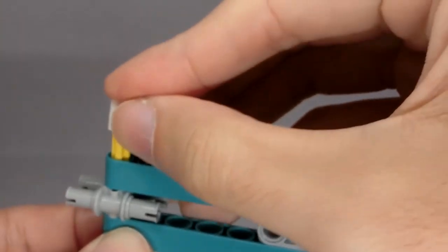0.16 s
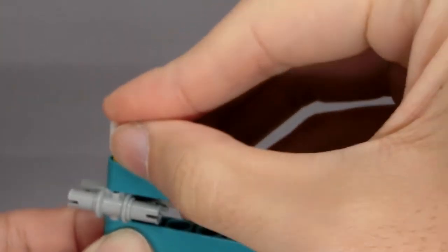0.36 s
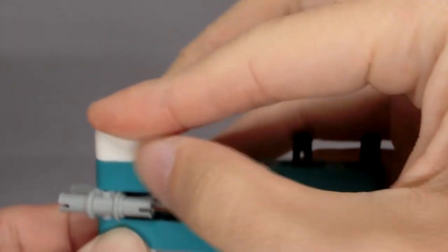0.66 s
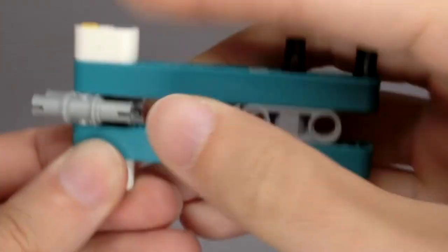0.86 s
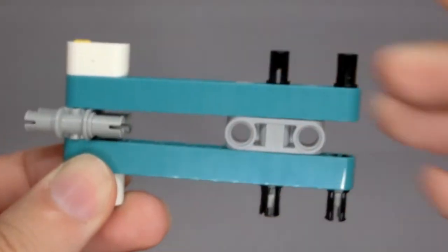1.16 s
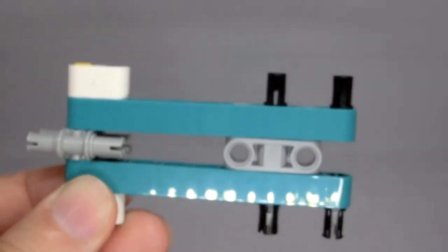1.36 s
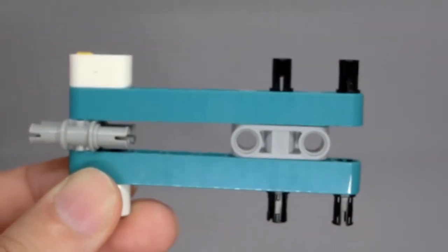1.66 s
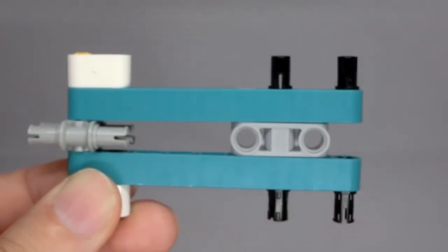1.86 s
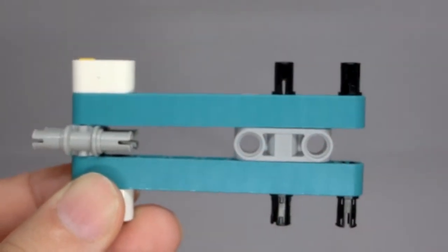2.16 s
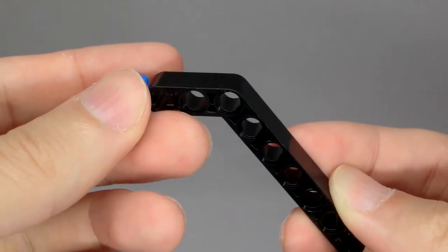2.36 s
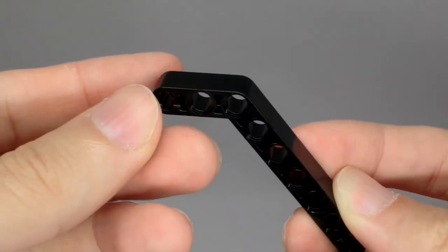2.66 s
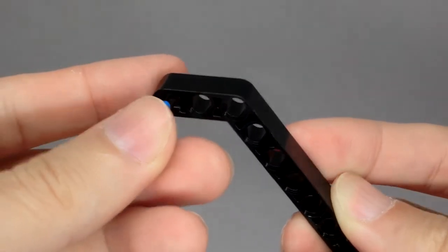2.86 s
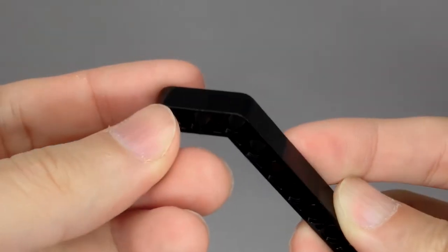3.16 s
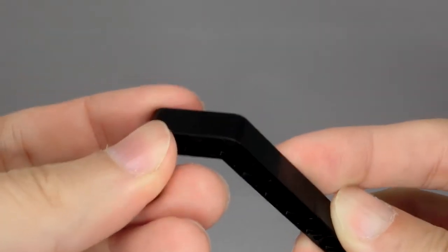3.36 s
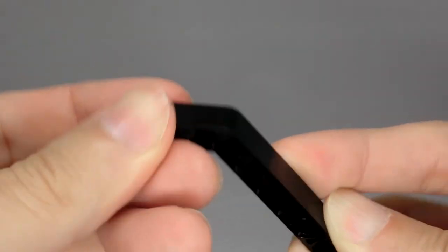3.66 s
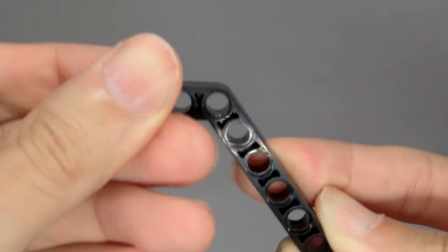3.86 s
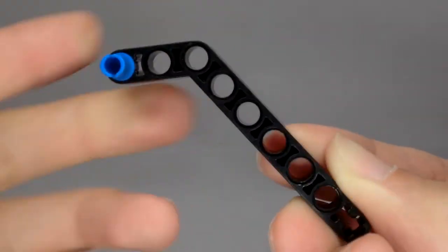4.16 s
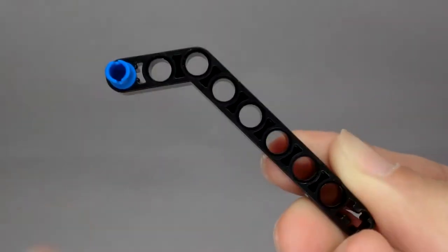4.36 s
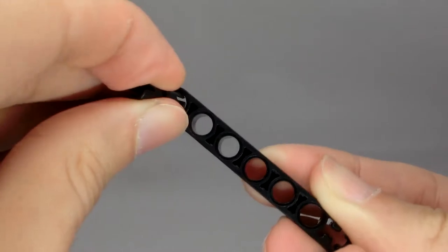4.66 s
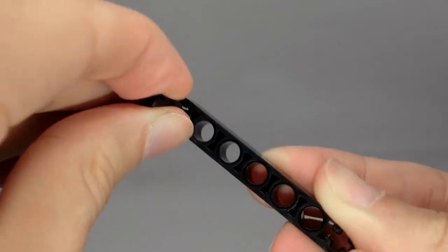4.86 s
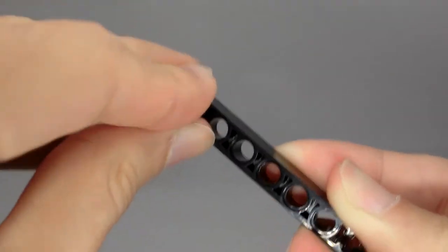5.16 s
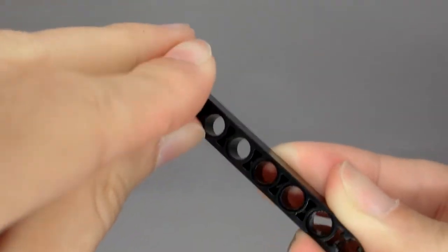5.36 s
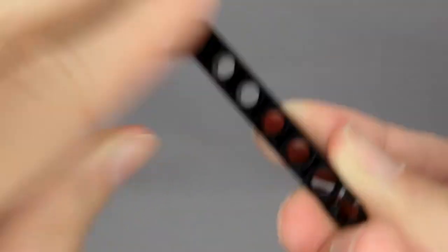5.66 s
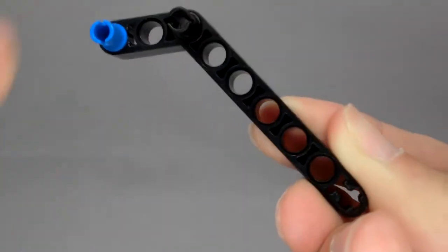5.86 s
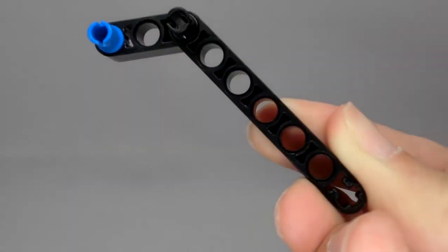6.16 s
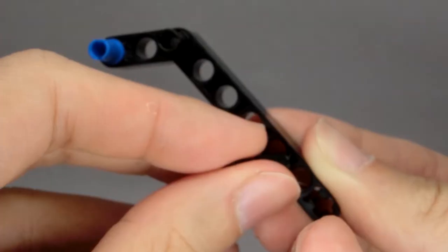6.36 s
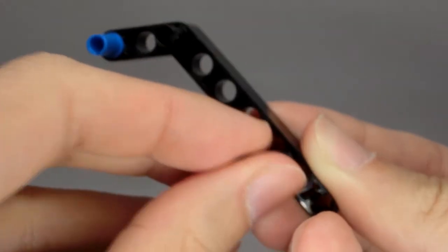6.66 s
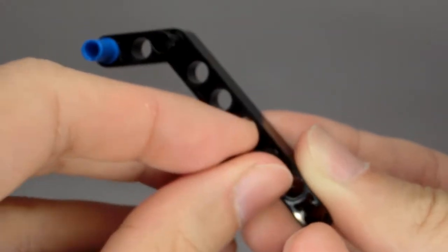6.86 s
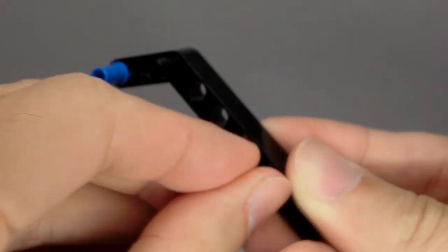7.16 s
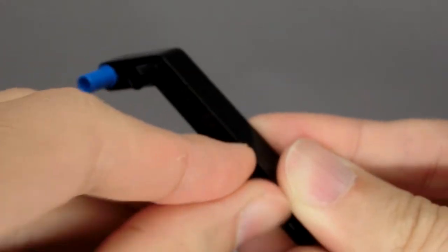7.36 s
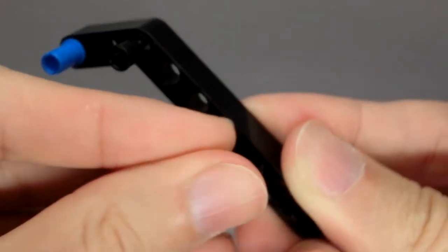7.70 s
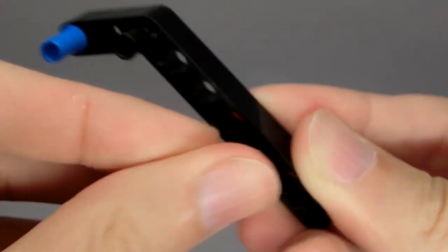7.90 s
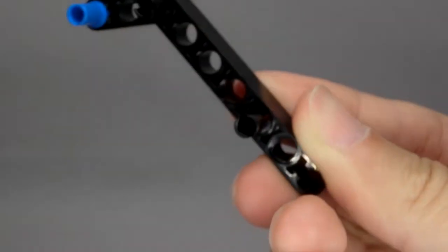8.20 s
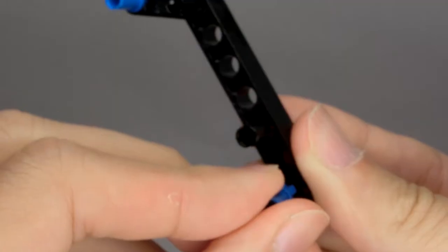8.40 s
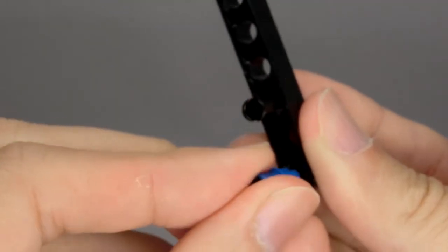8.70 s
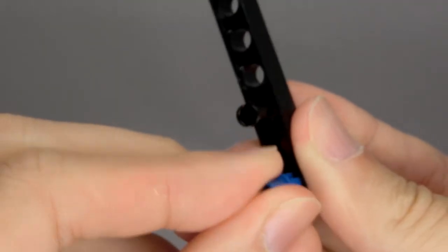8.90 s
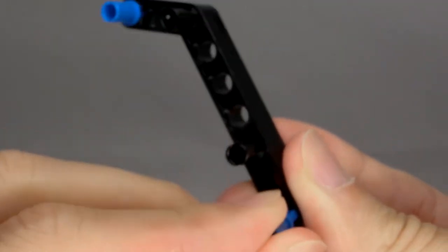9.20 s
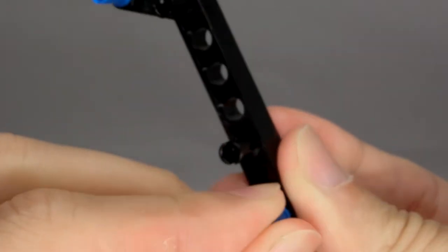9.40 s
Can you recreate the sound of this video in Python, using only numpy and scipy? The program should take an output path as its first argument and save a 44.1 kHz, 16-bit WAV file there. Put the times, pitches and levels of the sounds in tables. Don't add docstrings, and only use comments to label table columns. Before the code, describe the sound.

Close by, plastic pins snap sharply into plastic beams, two early and one midway, among light clacks, ticks and skin rubs in a quiet room.

```python
import sys
import numpy as np
from scipy import signal
from scipy.fft import rfft, irfft, next_fast_len
from scipy.io import wavfile
from scipy.ndimage import uniform_filter1d

SR = 44100
rng = np.random.default_rng(int(sys.argv[2]) if len(sys.argv) > 2 else 0)


def store_pcm(level_fs):
    pcm = np.round(np.clip(level_fs, -1, 1) * 32767).astype(np.int16)
    wavfile.write(sys.argv[1], SR, np.atleast_2d(pcm).T)


def natural_amplitude(level_db):
    exponent = np.asarray(level_db, float) / 20
    return 10 ** exponent


N = 420713
LEAD = 24


def evened(x):
    return x / np.sqrt(np.mean(x ** 2) + 1e-20)


def read(points, hz):
    f, value = np.transpose(points)
    return np.interp(np.log(hz + 1), np.log(f + 1), value)


def add(mix, s, sound):
    part = mix[:, round(s * SR):][:, :sound.shape[1]]
    part += sound[:, :part.shape[1]]


def panned(x, db):
    return x * natural_amplitude(np.array([[db / 2], [-db / 2]]))


def drift(top_hz):
    t = np.arange(0, N / SR + 1, .01)
    slow = 0
    for f in np.geomspace(.2, top_hz, num=24):
        slow = slow + np.sin(2 * np.pi * (f * t + rng.random())) / np.sqrt(f)
    return np.interp(np.arange(N) / SR, t, evened(slow))


def ring(drive, modes):
    t = np.arange(len(drive)) / SR
    body = 0
    for hz, width, db in modes:
        swell_and_fade = width * width * t * np.exp(-np.pi * width * t)
        body = body + natural_amplitude(db) * swell_and_fade * np.sin(2 * np.pi * hz * t)
    out = signal.fftconvolve(drive, body)[:len(drive)]
    return out / abs(out).max()


def crack(rattle_db, rattle_s):
    t = np.arange(2000) / SR
    grit = rng.standard_normal(2000)
    blow = 1. * (t == 0)
    return blow, natural_amplitude(rattle_db) * grit * np.exp(-t / rattle_s)


def coloured(drive, db, build_up=0):
    log_gain = np.log(natural_amplitude(np.maximum(np.r_[db, db[-2:0:-1]], -90)))
    phase = (1 - build_up) * signal.hilbert(log_gain).imag
    taps = np.roll(np.fft.ifft(np.exp(log_gain - 1j * phase)).real, LEAD)[:1024]
    swell = np.minimum(np.arange(len(taps)) / LEAD, 1)
    return signal.fftconvolve(drive, taps * swell)[:len(drive)]


def room(x):
    # (f/Hz, time to fall 60 dB/s)
    decay = [(300, 0.089), (1000, 0.065), (3500, 0.17), (8000, 0.094), (15000, 0.085)]
    taps = np.zeros((2, SR // 2))
    starts = np.arange(100, SR // 2 - 12, 12)
    at = starts + rng.integers(0, 12, (2, len(starts)))
    np.put_along_axis(taps, at, rng.choice([-1., 1.], at.shape), 1)
    hz, t, z = signal.stft(taps, SR, nperseg=128)
    fade = natural_amplitude(-60 * t / read(decay, hz)[:, None])
    tail = signal.istft(z * fade, SR, nperseg=128)[1]
    return signal.fftconvolve(x, tail / np.linalg.norm(tail[0]), axes=1)[:, :N]


def air():
    # (f/Hz, likeness from 0 to 1)
    likeness = [(30, 0.7), (120, 0.55), (500, 0.54), (1000, 0.21), (4000, 0.056), (6000, 0.12), (7500, 1),
                (15000, 1)]
    # (f/Hz, level/dB per Hz)
    hiss_colour = [(20, 4), (33, -3), (45, 2.5), (90, 3.5), (130, -2), (160, -3), (200, 0.5), (270, -6.5),
                   (430, -6), (650, -10.5), (1200, -15.5), (2800, -19), (6600, -21.5), (7100, -21.5),
                   (15500, -22.5)]
    seam_hz, edge_hz, level_db = 11800, 15260, -58.5
    frames, hz = N // 512 + 6, np.fft.rfftfreq(2048, 1 / SR)
    a, b, c, d, patches = rng.standard_normal((frames, 1025, 5)).T
    patches = evened(uniform_filter1d(uniform_filter1d(patches, 20, 0), 8, 1))
    same = np.clip(read(likeness, hz), -1, 1)[:, None]
    left = a + 1j * b
    right = same * left + np.sqrt(1 - same ** 2) * (c + 1j * d)
    seam = 1 - .8 * np.exp(-((hz - seam_hz) / 40) ** 2)
    edge = seam / (1 + (hz / edge_hz) ** 60)
    z = np.array([left, right]) * edge[:, None] * natural_amplitude(read(hiss_colour, hz)[:, None] + .9 * patches)
    return natural_amplitude(level_db) * evened(signal.istft(z, nperseg=2048, noverlap=1536)[1][:, :N])


def hum():
    # (multiple of its speed, level/dB)
    overtones = [(1, -55), (1.5, -79.5), (2, -75.5), (3, -81.5), (4, -83)]
    speed_hz, wander, sway_db = 58.3, .01, .6
    turns = np.cumsum(speed_hz * (1 + wander * drift(6))) / SR
    drone = 0
    for k, db in overtones:
        drone = drone + np.sqrt(2) * natural_amplitude(db + sway_db * drift(8)) * np.sin(2 * np.pi * k * turns)
    return drone


def bumps():
    # (t/s, peak level/dB, f/Hz, time to fall 60 dB/s)
    thuds = [
        (4.478, -44, 28, 0.14),
        (5.779, -40, 35, 0.14),
        (6.159, -42, 39.3, 0.12),
        (8.268, -36.5, 46, 0.073),
        (8.324, -36, 47.7, 0.11),
    ]
    out, t = np.zeros((2, N)), np.arange(SR // 4) / SR
    for s, db, hz, t60 in thuds:
        soft_start = 1 - np.exp(-t / 0.0075)
        thud = soft_start * natural_amplitude(db - 60 * t / t60) * np.sin(2 * np.pi * hz * t)
        add(out, s, panned(thud, 0))
    return out


def judder(start, end, db, first_hz, last_hz, gap):
    uneven_s, uneven_db, uneven_pitch = 0.00278, -0.5, 0.099
    late, strong, sharp = rng.standard_normal((14, 3)).T
    s = start + gap * np.arange(len(late))
    hz = np.interp(s, [start, end], [first_hz, last_hz]) * (1 + uneven_pitch * sharp)
    return list(zip(s + uneven_s * late, db + uneven_db * strong, hz, s < end))


def slips():
    # (t/s, peak level/dB,
    # f/Hz)
    single_slips = [(3.516, -46.5, 230), (3.99, -61, 680), (3.876, -56, 1080), (3.898, -54, 1000),
                    (3.902, -53, 417), (3.937, -53, 710), (3.943, -54, 466), (3.969, -52, 720),
                    (4.02, -59, 650), (4.047, -60, 606), (6.721, -55, 980), (8.224, -54, 470),
                    (8.546, -49.5, 474), (8.563, -51.5, 400), (8.65, -54, 463)]
    # (start t/s, end t/s, peak level/dB, first f/Hz, last f/Hz)
    judders = [
        (3.868, 4.046, -56, 735, 606),
        (8.272, 8.52, -71, 400, 450),
        (8.583, 8.63, -57, 493, 510),
        (8.688, 8.8, -56, 453, 470),
        (8.841, 9.12, -61, 497, 543),
    ]
    gaps = [.034, 0.027, 0.021, .021, 0.022]
    # (f/Hz, level/dB per Hz)
    rustle_colour = [(530, -28), (900, 5), (1420, -8), (1650, -1), (2960, -7), (4100, -9), (12000, -20),
                     (15600, -43), (22000, -120)]
    out, width = np.zeros((2, N)), 170
    rows = [(*row, True) for row in single_slips]
    for row, gap in zip(judders, gaps):
        rows += judder(*row, gap)
    for s, db, hz, on in rows:
        drive = sum(crack(-20.5, 0.012))
        if on:
            hollow = ring(drive, [(hz, width, 0), (1.57 * hz, 2 * width, -20)])
            add(out, s, natural_amplitude(db) * panned(hollow, -0.71))

    rub_s, seconds, rub_db = 4.585, 0.054, -62.5
    middle, side = rng.standard_normal((2, SR // 10))[:, :round(seconds * SR)]
    colour = read(rustle_colour, np.fft.rfftfreq(2048, 1 / SR))
    rustle = np.array([coloured(middle + .5 * k * side, colour) for k in (1, -1)])
    add(out, rub_s, natural_amplitude(rub_db) * evened(rustle) * np.linspace(.3, 1.3, num=len(middle)))
    return out


def ticks():
    # (t/s, peak level/dB, bright ring f/Hz, body level/dB, left over right level/dB)
    taps = [(0.4943, -49.5, 5650, -28, -1.0), (0.8505, -49, 7280, -25, 4), (1.9928, -47.5, 10300, -11, 17),
            (2.606, -50, 12400, -17, 14), (2.8809, -50.5, 6980, -22, -1.5),
            (2.9726, -50.5, 7020, -28, -1.5), (4.9257, -47, 12300, -21, 13), (5.6615, -53, 11600, -15, -5),
            (6.736, -47, 6960, -25, -4), (7.5033, -59, 8900, -24, 16), (7.693, -49, 5880, -16, -8),
            (7.9506, -49, 12700, -15, -11)]
    # (f/Hz, width/Hz, level/dB)
    middle_modes = [(2300, 270, -1), (3830, 790, -8)]
    # (f/Hz, width/Hz, level/dB)
    body_modes = [(432, 530, 0), (1055, 350, 10), (1420, 1380, 1)]
    out = np.zeros((2, N))
    for s, db, hz, body_db, pan_db in taps:
        drive = sum(crack(-7.0, 0.0025))
        bright = ring(drive, [(hz, 2000, 0), (hz * 0.73, 2000, -5), (min(hz * 1.32, 14200), 2000, -9)])
        middle = natural_amplitude(-13.5) * ring(drive, middle_modes)
        add(out, s, natural_amplitude(db) * panned(bright + middle, pan_db))
        body = ring(drive, body_modes)
        add(out, s, natural_amplitude(db + body_db + 2) * panned(body, 0.27 * pan_db))
    return out


def grip(hz, ring_hz, thud_db, shell_db):
    # (f/Hz, level/dB per Hz)
    thud = [(120, -34), (220, 8), (1080, 1.5), (1500, -28), (2300, -2), (4000, -44)]
    # (f/Hz, level/dB per Hz)
    shell = [(1500, -38), (2750, -3), (3700, 1), (4500, -8), (7900, 5), (10500, -7), (14500, -22),
             (15800, -46)]
    width_hz = 810
    off_tune = ring_hz / width_hz * (hz / ring_hz - ring_hz / (hz + 1))
    free = 1 / (1 + off_tune ** 2) ** 2
    thud_power = natural_amplitude(2 * (read(thud, hz) + thud_db))
    shell_power = natural_amplitude(2 * (read(shell, hz) + shell_db))
    return 10 * np.log10(free + thud_power + shell_power)


def strike(db, pan_db, rattle_db, rattle_s, colour, loose, echoes):
    left_lag = 0.3
    hz = np.fft.rfftfreq(2048, 1 / SR)
    shade = np.clip(hz / 5000, 0, 1) / 2
    sides = [side * pan_db * shade for side in (1, -1)]
    blow, rattle = crack(0, rattle_s)
    rattle = rattle * np.minimum(np.arange(len(rattle)) / (SR * 0.001), 1) ** 2
    rattle = rattle / np.linalg.norm(rattle)
    for late, gain_db in echoes:
        rattle = rattle + natural_amplitude(gain_db) * np.roll(blow, round(late * SR))
    chance = uniform_filter1d(abs(rfft(rattle, 2048)) ** 2, size=16)
    blurred = loose - 10 * np.log10(chance)
    blow = np.array([coloured(blow, colour + g, .45) for g in sides])
    rattle = np.array([coloured(rattle, blurred + g) for g in sides])
    click = blow + natural_amplitude(rattle_db) * rattle * np.linalg.norm(blow) / np.linalg.norm(rattle)
    delays = [np.sinc(np.arange(-8, 9) - d) for d in (left_lag, 0)]
    click = np.array([np.convolve(c, delay, "same") for c, delay in zip(click, delays)])
    return click * natural_amplitude(db) / abs(click.mean(0)[:70]).max()


def snaps():
    # (t/s, peak level/dB, left over right level/dB, rattle level/dB, rattle fade/s)
    pins = [
        (0.3059, -1.5, -5, -9.5, 0.0038),
        (0.5636, -10.5, -4, -7, 0.0036),
        (5.4505, -10.5, -4, -2.5, 0.0027),
    ]
    # (f/Hz, level/dB per Hz)
    beams = [
        [(120, -53), (300, -34), (2400, -21), (2900, -31), (3400, -20.5), (6400, -11), (6800, -5), (7400, -5),
         (8600, -17), (9600, -2), (10800, 0), (12800, -8), (13200, -21), (14400, -4), (15200, -11),
         (15800, -26)],
        [(120, -48), (300, -31), (800, -22), (1400, -41), (2900, -18), (3600, -17), (4600, -38), (5600, -16),
         (6800, -18), (7400, -6), (9800, -23), (11200, -3), (12400, 4), (13600, -16), (15400, -18),
         (15800, -31)],
        [(120, -37), (300, -17), (900, 1), (1500, -3), (2300, -18), (5200, -3), (6200, -21), (6800, -7),
         (9800, -6), (10600, -16), (11000, -5), (12600, 3), (13400, -17), (14200, -1), (15000, -5),
         (15800, -25.5)],
    ]
    # (f/Hz, level/dB per Hz)
    beam_rattles = [
        [(120, -40), (300, -30), (700, -21), (1700, -8), (2500, -15.5), (5200, -13), (6000, -19), (7000, 1),
         (8600, -12), (9200, -6), (11800, -1), (12200, -6), (14800, -4), (15800, -27)],
        [(120, -52), (300, -36), (800, -23), (1700, -25), (3400, -11), (5200, -27), (6200, -11), (7600, -12),
         (8400, -22), (10000, -8), (11000, -7), (11600, -7), (15200, -24), (15800, -32)],
        [(120, -21), (300, -10), (900, -10), (1500, -5), (2400, -21), (3600, -11), (6000, -11), (8600, -6),
         (9000, -9), (10000, 2), (11000, -11), (13600, -3), (14800, -10), (15800, -33)],
    ]
    # (t/s, peak level/dB, left over right level/dB, rattle level/dB, rattle fade/s)
    clacks = [
        (2.7564, -27.5, -4, 4.5, 0.0075),
        (3.5162, -35, -5, -2.5, 0.005),
        (4.0701, -36, -5, 1, .003),
        (7.1861, -29, -5, 0.5, 0.0029),
        (8.7351, -33.5, -6, 2.5, .004),
        (9.3451, -32, -3, 0.5, 0.0034),
        (.3356, -33, -4, 2.5, 0.0037),
        (1.163, -39.5, 14, 3, .004),
        (7.7162, -37, -12, -1, .004),
    ]
    # (f/Hz, level/dB per Hz)
    clack_colours = [
        [(120, -27), (300, -12), (1300, -20), (1800, -31), (3000, -5), (5200, -16), (9000, 2), (10800, -15),
         (14000, -17), (14800, 2), (15800, -8)],
        [(120, -17), (300, 1), (800, 3), (4000, -26), (5000, -17), (5800, -4), (6600, -28), (7800, -17),
         (12000, -30), (12400, -19), (15800, -33)],
        [(120, -43), (300, -28), (800, -31), (1200, -20), (1800, -30), (6400, -23), (7200, -16), (10400, -11),
         (11000, 2), (13800, -3), (15800, -33)],
        [(120, -26), (300, -1), (1000, 3), (1800, -22), (3800, -9), (4600, -34), (5400, -2), (8200, -26),
         (8600, -41), (11800, -13), (15800, -22.5)],
        [(120, -25), (300, -13), (1200, -20), (1900, -37), (3400, -1), (6400, -11), (6800, 3), (11400, -7),
         (12000, -21), (13400, -7), (15800, -28)],
        [(120, -23), (300, 1), (900, 4), (2400, -31), (4800, -5), (6400, -13), (7600, -4), (11200, -9),
         (11800, -17), (13000, -3), (15800, -34)],
        [(120, -17), (300, -4), (700, 8), (1200, 4), (2900, -26), (4000, -11), (8600, -15), (9000, -5),
         (13200, -8), (13800, -16), (15800, -20)],
        [(120, -27), (300, -15), (2700, 2), (5000, -15), (7200, 0), (9600, -31), (10200, -11), (12600, -31),
         (13000, -14), (15600, -36), (15800, -29)],
        [(120, -22), (300, -2), (1000, 4), (2000, -22), (2400, -12), (5000, -13), (6200, -26), (7600, -9),
         (13800, -10), (15400, -34), (15800, -54)],
    ]
    # (f/Hz, level/dB per Hz)
    clack_rattles = [
        [(120, -33), (300, -20), (1700, -24), (4000, 0), (5600, -11), (8800, 4), (10800, -10), (14000, -14),
         (15000, -3), (15800, -18)],
        [(120, -15), (300, 0), (3600, -22), (3800, -31), (5800, -11), (9600, -15), (10200, -21), (11400, -14),
         (12200, -22), (15800, -24)],
        [(120, -32), (300, -17), (2500, -30), (2800, -21), (6600, -8), (10200, -9), (11400, 0), (13000, -13),
         (13600, -9), (15800, -21)],
        [(120, -15), (300, -4), (1000, -3), (2000, -24), (4000, -7.5), (7400, -20), (8000, -8), (10600, -25),
         (11600, -12), (15800, -31)],
        [(120, -29), (300, -16), (2100, -20), (3200, -13), (5200, -14), (6800, -2), (9000, -12), (12600, -11),
         (15200, -25), (15800, -37)],
        [(120, -14), (300, -3), (900, -4), (2000, -17), (2600, -12), (3200, -20), (4600, -2), (7800, -6),
         (13600, -9), (15800, -29)],
        [(120, -21), (300, -1), (1100, -6), (2300, -14), (7000, -10), (8200, -10), (11000, -4), (11200, -5),
         (14600, -7), (15800, -17)],
        [(120, -23), (300, -8), (1200, -1), (3000, -7), (4000, -21), (5400, -20), (7000, -6), (8200, -27),
         (10200, -15), (15800, -26)],
        [(120, -18), (300, 0), (900, 0), (2300, -15), (3800, -9), (6000, -25), (9800, -13), (13800, -28),
         (14200, -22), (15800, -41)],
    ]
    # (delay t/s, level/dB)
    reflections = [
        [(0.011, -20)],
        [(.003, 2), (.015, -21)],
        [(.0017, -5)],
        [(.0055, -8), (.0064, -4)],
        [(.0018, -2)],
        [(.0026, 3)],
        [(.0016, -7)],
        [(.0028, -2)],
        [(.0012, -11), (.0019, -6)],
        [],
        [],
        [(.0019, -3)],
    ]
    # (t/s, peak level/dB, ring f/Hz, thud level/dB, shell level/dB)
    knocks = [
        (0.049, -43.5, 1500, -24, -36.5),
        (3.2365, -37, 8900, 3.5, -1),
    ]
    near, far = np.zeros((2, 2, N))
    hz = np.fft.rfftfreq(2048, 1 / SR)
    hits = []
    for row, beam, loose, echoes in zip(pins + clacks, beams + clack_colours,
                                         beam_rattles + clack_rattles, reflections):
        hits.append((*row, -10, read(beam, hz), read(loose, hz), echoes))
    for s, db, *how in knocks:
        colour = grip(hz, *how)
        hits.append((s, db, -4, 0, 0.0025, -9, colour, colour, []))
    for s, db, pan_db, rattle_db, rattle_s, room_db, colour, loose, echoes in hits:
        click = strike(db, pan_db, rattle_db, rattle_s, colour, loose, echoes)
        creep = natural_amplitude(db - 45.5) * np.diff(rng.standard_normal(61)) * np.linspace(0, 1, num=60)
        add(near, s - 60 / SR, panned(creep, pan_db))
        add(near, s - LEAD / SR, click)
        add(far, s - LEAD / SR, natural_amplitude(room_db) * click)
    return near, far


def scene():
    background = panned(air() + hum(), -1.3)
    small = slips() + ticks()
    near, far = snaps()
    return near + small + room(far + natural_amplitude(-8) * small) + bumps() + background


def band_limit(x):
    return signal.sosfilt(signal.butter(12, 16840, fs=SR, output="sos"), x)


def record(dry):
    # (from t/s, to t/s, share lost)
    hush = [
        (.292, .300, .8),
        (.548, .554, 1.),
        (3.497, 3.508, .4),
        (5.436, 5.442, 1.),
        (9.338, 9.342, .5),
    ]
    edge_hz, treble_hz = 16160, 1300
    size = next_fast_len(N)
    hz, t = np.fft.rfftfreq(size, 1 / SR), np.arange(N) / SR
    spectrum = rfft(dry, size, axis=1) / (1 + (hz / edge_hz) ** 60)
    whole = irfft(spectrum, size, axis=1)[:, :N]
    treble = irfft(spectrum / (1 + (treble_hz / (hz + 1)) ** 8), size, axis=1)[:, :N]
    lost = sum(share * ((t > a) & (t < b)) for a, b, share in hush)
    return band_limit(whole - treble * uniform_filter1d(lost, 60))


dry = scene()
out = record(dry)
store_pcm(out)
```